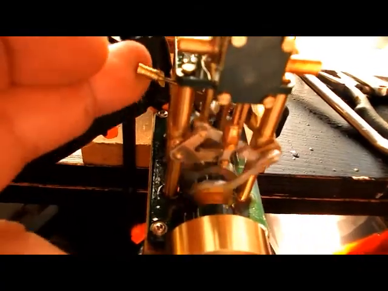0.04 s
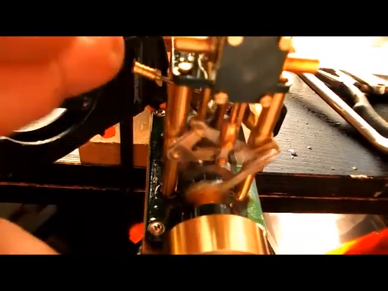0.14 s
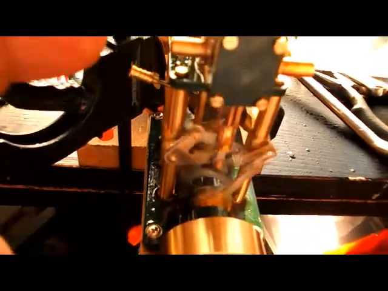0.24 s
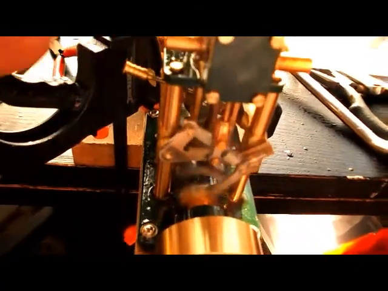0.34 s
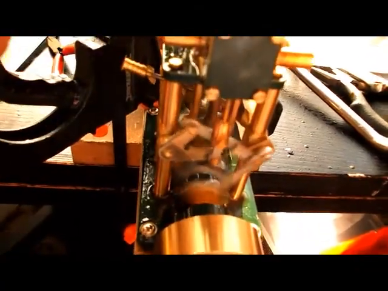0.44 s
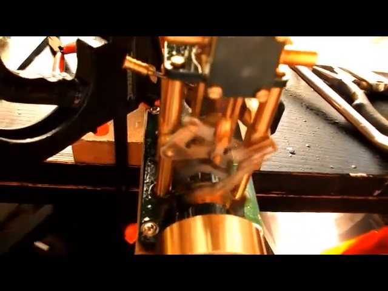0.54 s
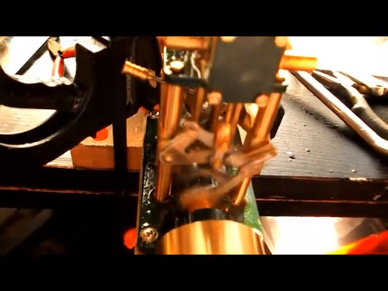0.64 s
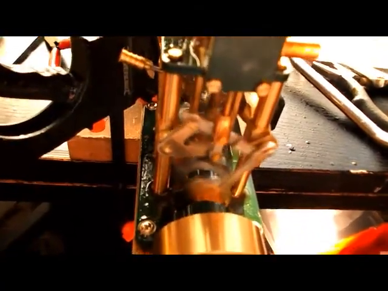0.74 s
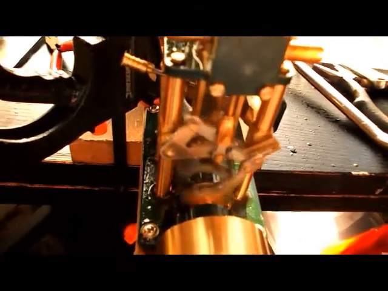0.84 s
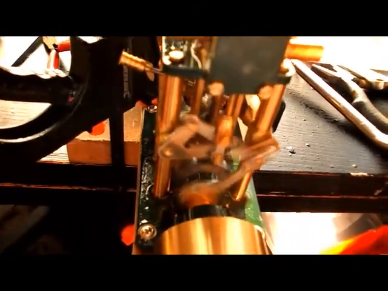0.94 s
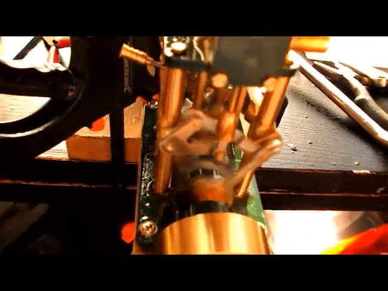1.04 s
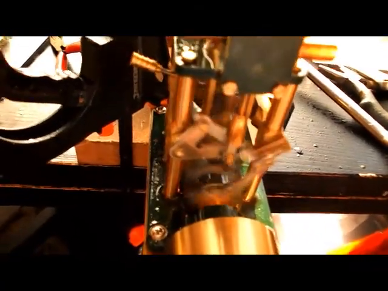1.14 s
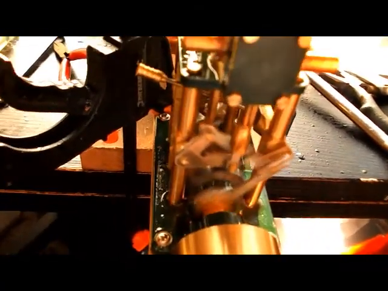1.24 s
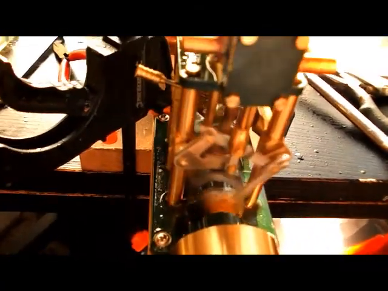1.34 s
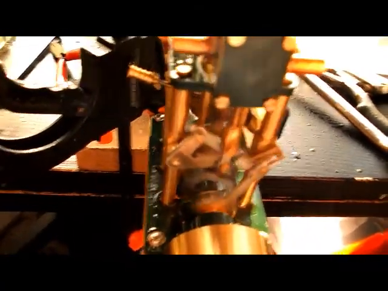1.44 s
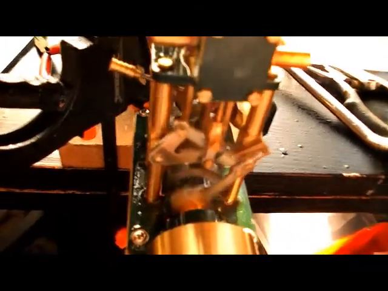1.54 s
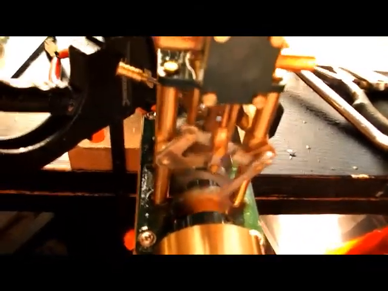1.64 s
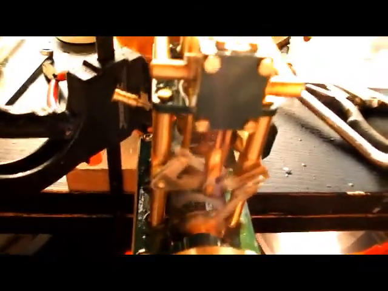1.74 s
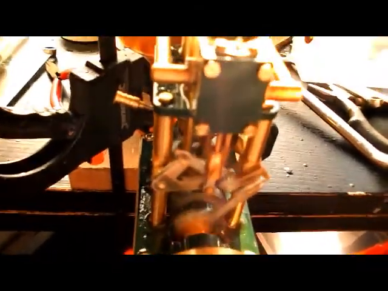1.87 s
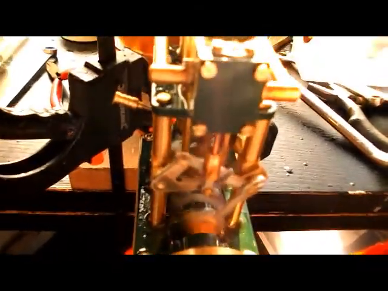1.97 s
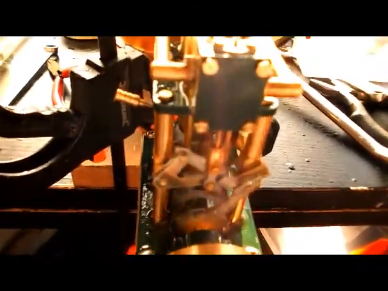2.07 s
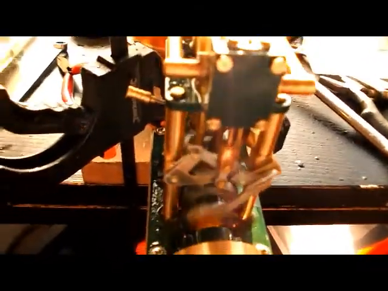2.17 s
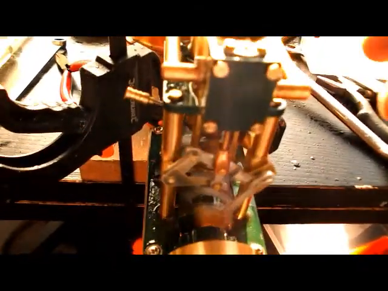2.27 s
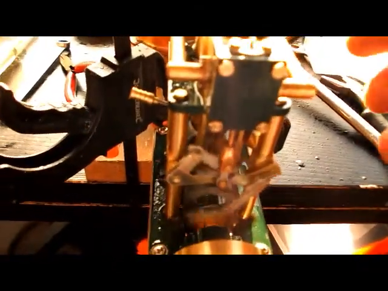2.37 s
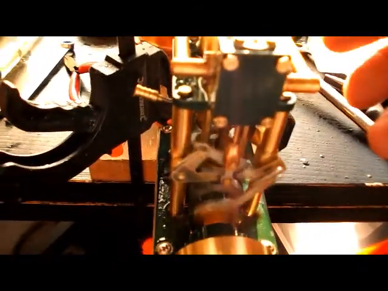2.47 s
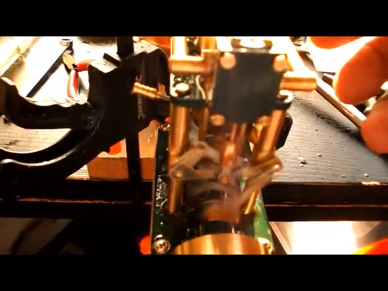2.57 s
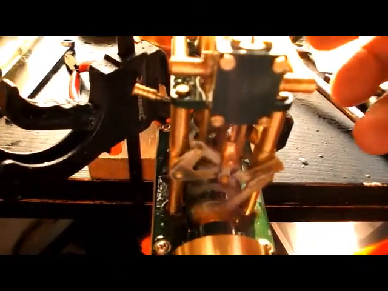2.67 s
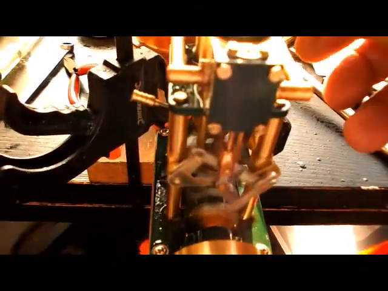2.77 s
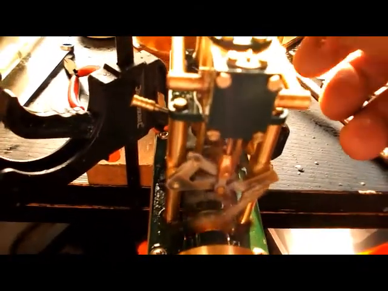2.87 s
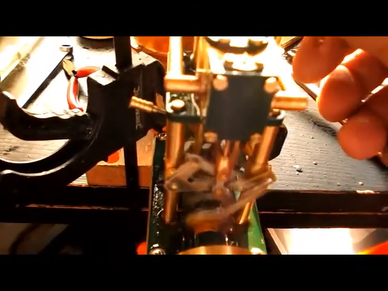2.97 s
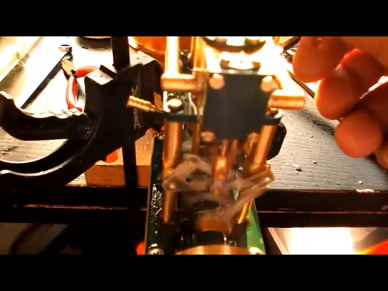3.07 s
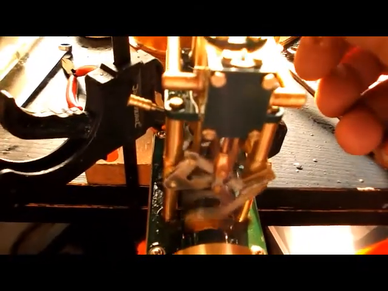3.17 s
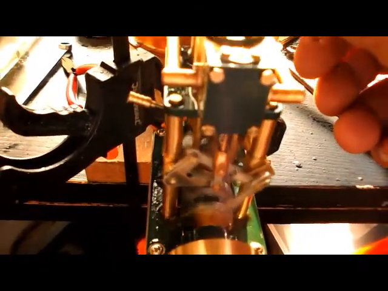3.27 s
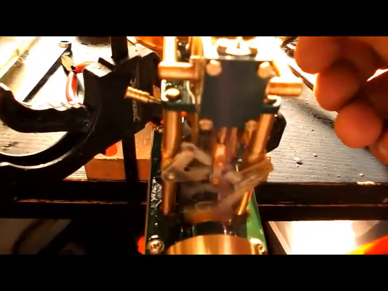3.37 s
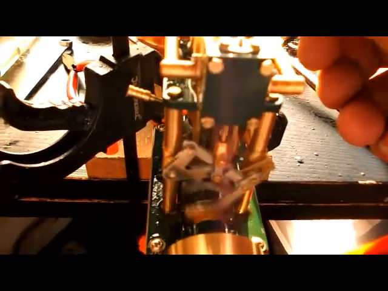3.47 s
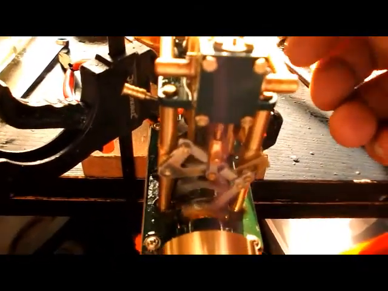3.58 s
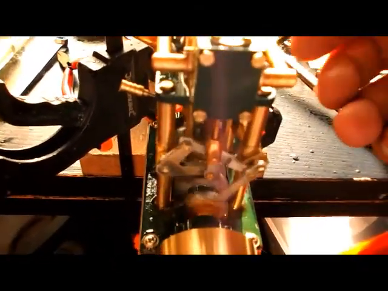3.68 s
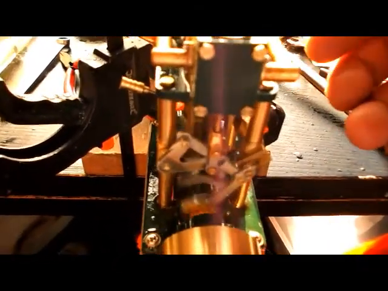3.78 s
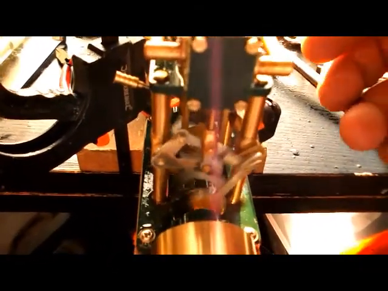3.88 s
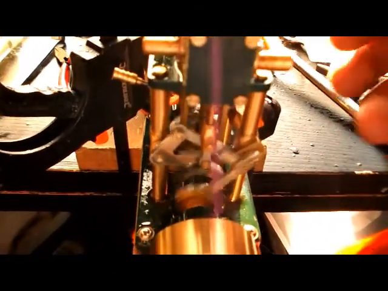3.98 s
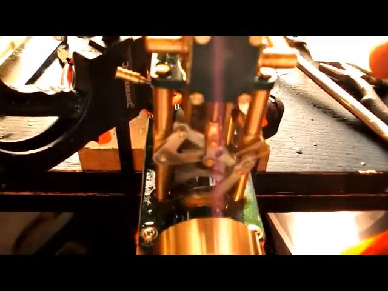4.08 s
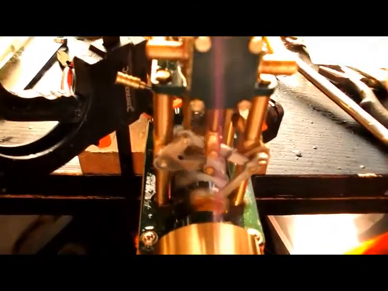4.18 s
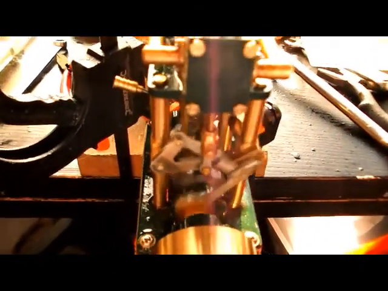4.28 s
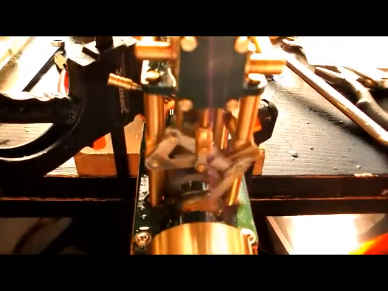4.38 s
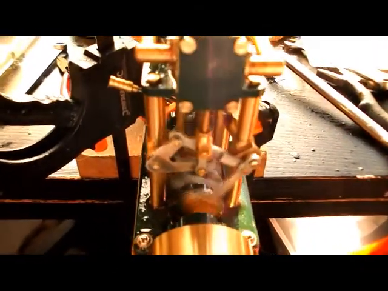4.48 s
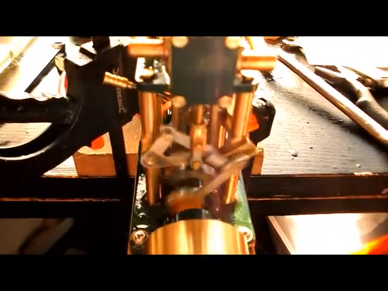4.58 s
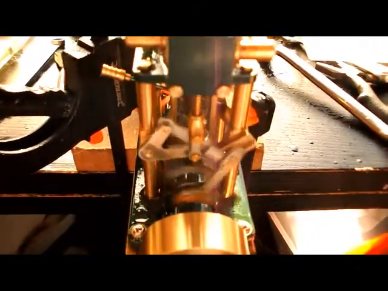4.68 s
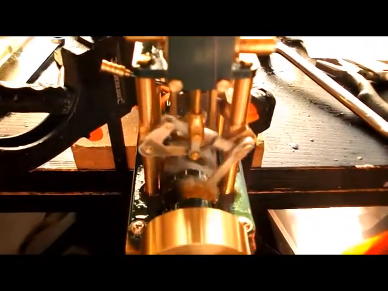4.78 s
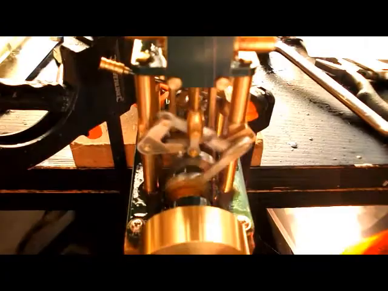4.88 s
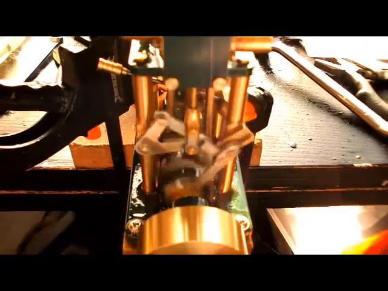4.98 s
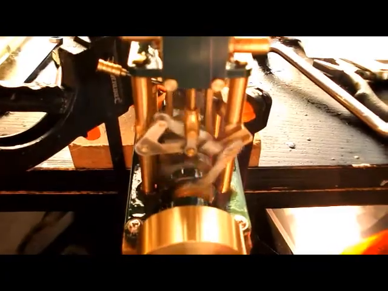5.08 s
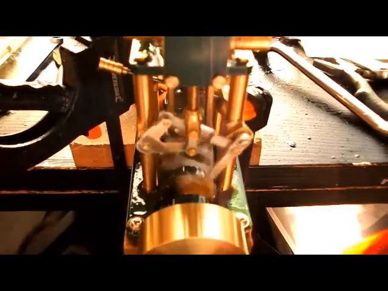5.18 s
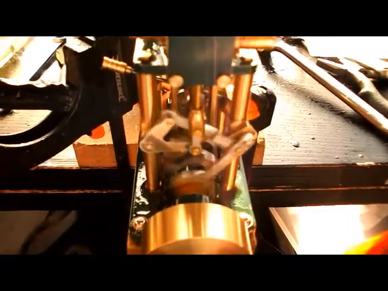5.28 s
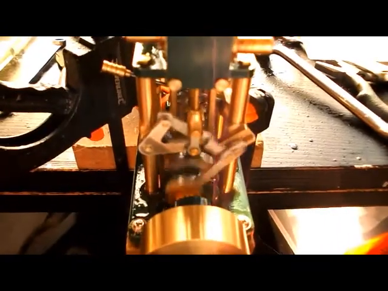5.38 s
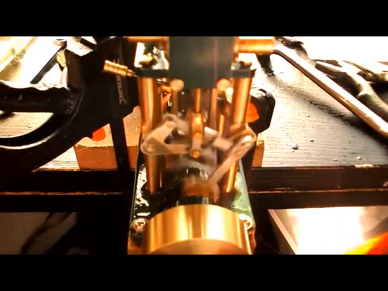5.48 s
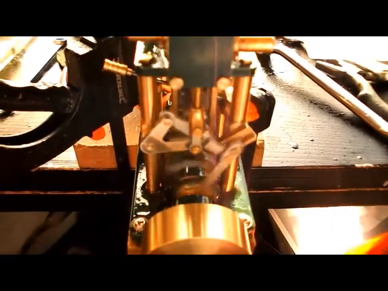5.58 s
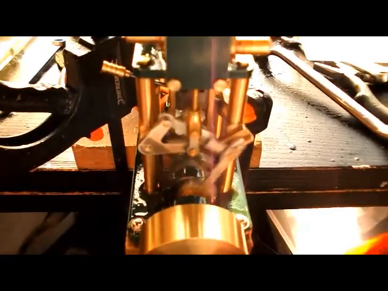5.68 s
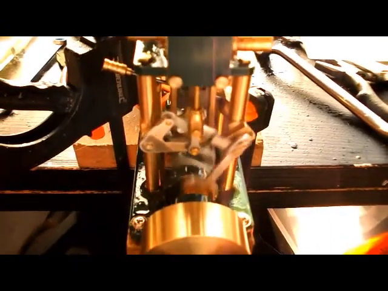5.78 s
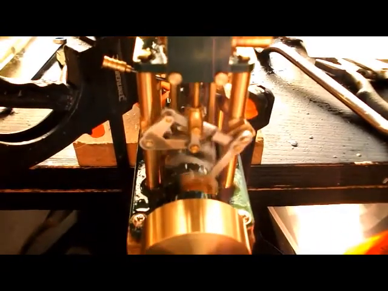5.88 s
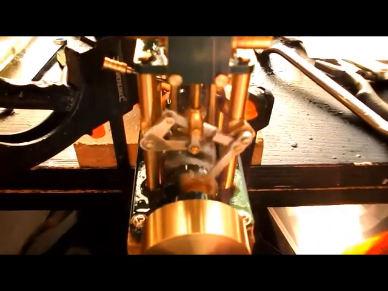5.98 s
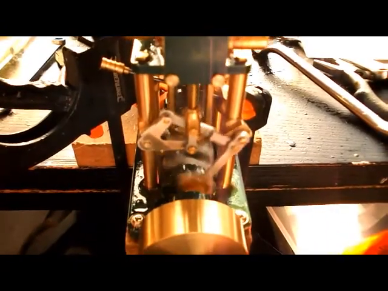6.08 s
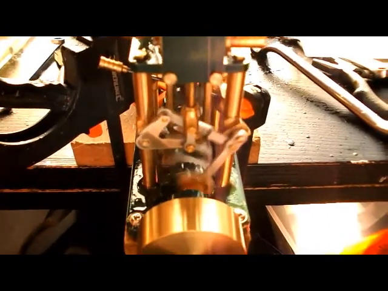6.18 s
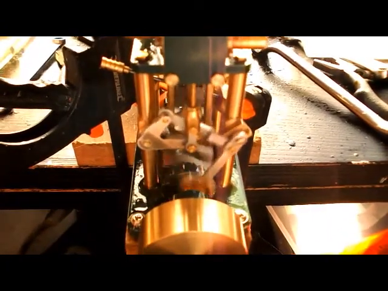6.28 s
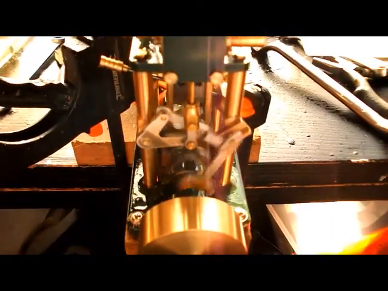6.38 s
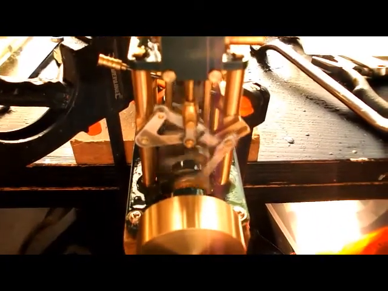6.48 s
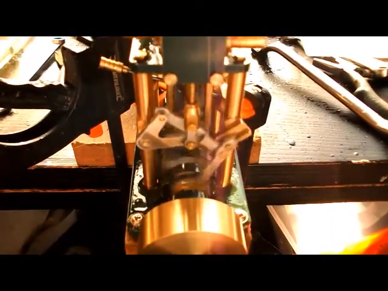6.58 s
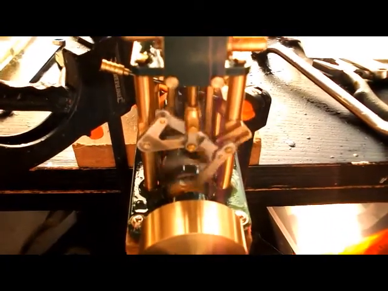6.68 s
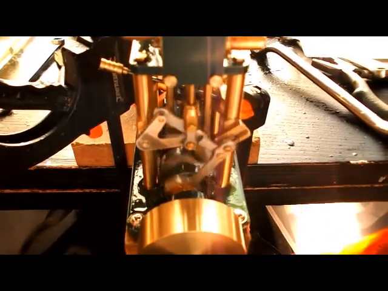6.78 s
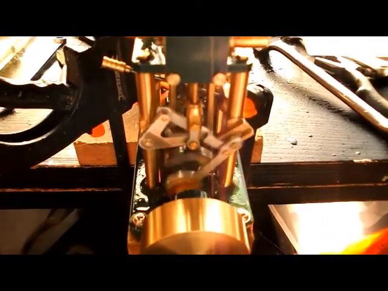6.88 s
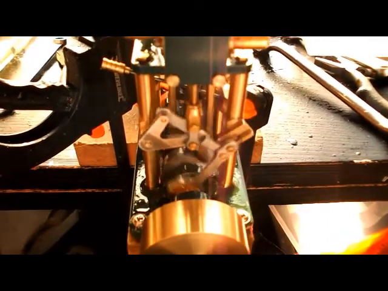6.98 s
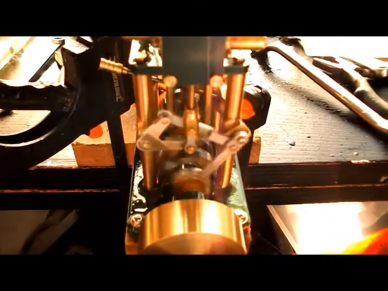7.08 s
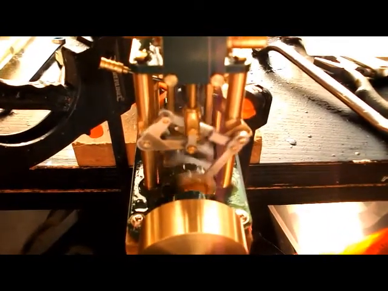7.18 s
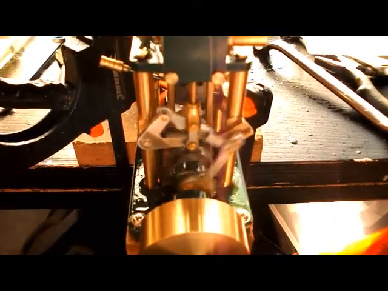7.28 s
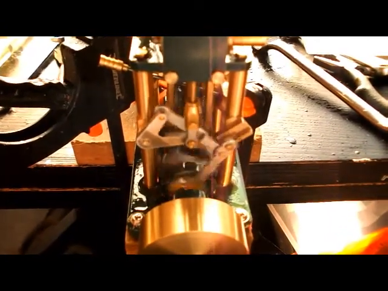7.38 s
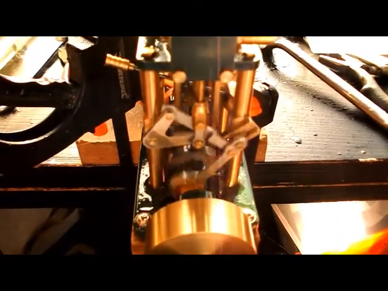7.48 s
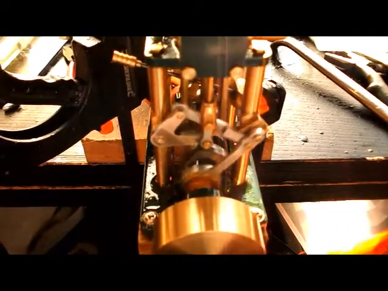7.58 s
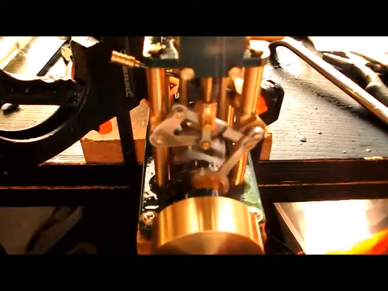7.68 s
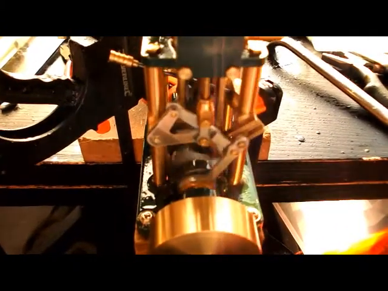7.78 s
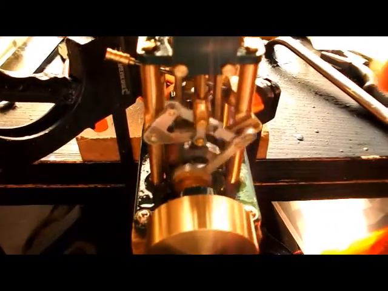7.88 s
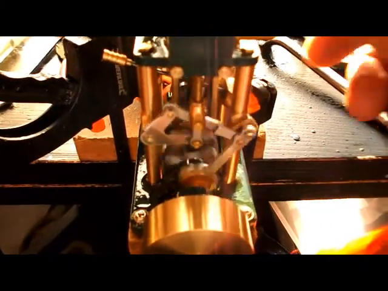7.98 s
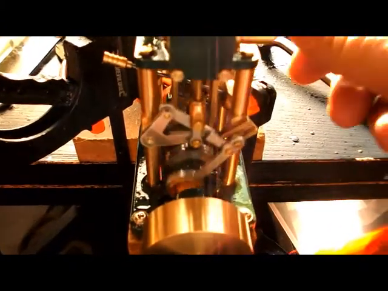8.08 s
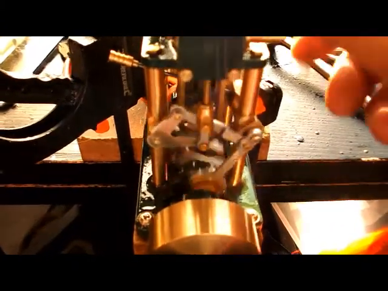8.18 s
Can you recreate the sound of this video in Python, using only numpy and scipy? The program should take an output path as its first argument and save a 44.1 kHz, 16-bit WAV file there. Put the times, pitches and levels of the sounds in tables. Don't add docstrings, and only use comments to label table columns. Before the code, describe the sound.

A small brass steam engine on an indoor workbench, heard very close and dry. It starts within a fraction of a second, racing into a dense metallic clatter with steam hiss and low bench hum. Sharp stray knocks overload the microphone and briefly dip the sound. Around 3.5 seconds it is throttled back, becoming quieter and slower until individual clicks and knocks stand out.

```python
import sys
import numpy as np
from scipy import signal
from scipy.fft import rfft, irfft, next_fast_len
from scipy.io import wavfile
from scipy.ndimage import uniform_filter1d, map_coordinates

SR = 44100
rng = np.random.default_rng(int(sys.argv[2]) if len(sys.argv) > 2 else 0)


def boost(x):
    u = np.asarray(x, float) / 20
    return 10 ** u


def pcm_store(signal):
    levels = np.round(np.clip(np.atleast_2d(signal), -1, 1) * 32767)
    wavfile.write(sys.argv[1], SR, levels.astype(np.int16).T)


N = 362937
T_S = np.arange(N) / SR

# (frequency [Hz], density [dB per Hz])
AIR_SPECTRUM = [(12, -56), (20, -19), (145, -13.5), (286, 0), (392, -8), (600, -11.5), (780, -12),
                (1320, -120)]
STEAM_SPECTRUM = [(880, -35), (1500, -6), (2390, -12.5), (3150, -10), (5330, -25), (6760, -4), (9650, -22),
                  (16000, -11)]

# (frequency [Hz], width [Hz], level [dB])
BENCH_MODES = [(138, 36, -22), (239.4, 5.2, 1), (287.3, 8.8, 2.5), (311, 36, -8), (425, 51, -17)]
FRAME_MODES = [(455, 35, -10), (560, 35, -6), (680, 80, -14), (770, 45, -8), (845, 50, -5), (908, 40, -1),
               (1085, 80, -2), (1210, 50, -3), (1330, 120, -12)]
BRACKET_MODES = [(1480, 120, -12), (1655, 60, 0), (1770, 70, -4), (1880, 90, -11), (2010, 90, -5)]
ROD_MODES = [(2250, 260, -16), (2645, 115, 0), (3090, 240, -11)]
LINK_MODES = [(3330, 300, -6), (3700, 320, -2), (4100, 300, -1), (4450, 300, -2), (5150, 320, 0),
              (5850, 600, -5), (6450, 500, -4), (7200, 500, -5)]
PIN_MODES = [(8230, 970, -3), (9380, 1350, -3), (12900, 5100, -9.5), (14300, 330, -15)]
# (frequency [Hz], width [Hz], level [dB])
HOUSING_NOTCHES = [(7700, 170, -11), (11100, 900, -3), (14450, 200, -8)]

# (time [s], rate [turns/s])
CRANK_SPEED = [(.1, 18.3), (.25, 25), (.35, 26.46), (1, 26.488), (1.55, 27.082), (2, 26.601),
               (3.47, 25.754), (3.55, 18.337), (3.68, 14.886), (3.85, 13.953), (4.5, 13.365), (5.5, 11.779),
               (6.35, 9.203), (6.72, 9.391), (6.95, 8.602), (7.45, 8.326), (8, 5.99), (8.45, 4.148)]
# (time [s], shake [dB], bench [dB])
EFFORT_CURVE = [(0, -41.5, -51), (.065, -34, -32), (.095, -26.5, -36), (.15, -24.5, -42), (.45, -26.5, -33),
                (1.3, -26.5, -28.5), (2.1, -27, -29), (3.46, -27, -28.5), (3.66, -30.5, -34),
                (4.3, -32, -29), (5.1, -33, -34.5), (6.1, -34.5, -40), (7.6, -36, -41.5),
                (8.23, -39, -42.5)]
# (crank angle [turns], racing [dB], throttled [dB])
BENCH_PUSHES = [
    (.06, 11, 4),
    (.42, -17, 7),
    (.68, -29, 7.5),
]
# (crank angle [turns], racing [dB], throttled [dB])
BRACKET_HITS = [
    (.006, -31, -35.5),
    (.11, -28, -29),
    (.25, -50, -45),
    (.39, -23, -34),
    (.428, -43, -27),
    (.68, -28.5, -35),
    (.8, -49, -40.5),
]

# (crank angle [turns], frame [dB], rod [dB], link [dB], pin [dB])
LOOSE_HITS = [(.007, -31, -22, -17, -23), (.045, -40, -9, -12, -26), (.056, -38, -26, -9, -18),
              (.105, -29, -25, -22, -26), (.175, -30, -31, -17, -19), (.242, -31, -25, -19, -8),
              (.302, -40, -15, -26, -34), (.314, -37, -28, -14, -22), (.388, -34, -33, -23, -22),
              (.545, -33, -28, -10, -14), (.598, -38, -37, -19, -15), (.714, -34, -37, -19, -28),
              (.729, -39, -51, -15, -20), (.91, -38, -38, -23, -18)]
SEATED_HITS = [(.005, -44, -22, -38, -38), (.044, -43, -9, -10, -19), (.063, -35, -23, -16, -17),
               (.112, -27, -27, -24, -33), (.183, -31, -33, -16, -15), (.244, -24, -27, -18, -7),
               (.304, -48, -11, -19, -25), (.324, -44, -25, -20, -23), (.39, -30, -31, -27, -22),
               (.557, -40, -38, -29, -23), (.608, -35, -41, -28, -18), (.694, -29, -34, -16, -25),
               (.734, -33, -41, -24, -18), (.92, -40, -47, -24, -19)]
THROTTLED_HITS = [(.045, -45, -24, -23, -26), (.093, -36, -18, -28, -28), (.124, -36, -32, -34, -36),
                  (.193, -36, -44, -30, -28), (.28, -34, -43, -29, -25), (.356, -37, -23, -26, -22),
                  (.424, -38, -26, -26, -25), (.438, -40, -36, -23, -20), (.634, -45, -29, -21, -22),
                  (.665, -42, -42, -26, -24), (.777, -39, -36, -24, -22), (.957, -53, -44, -27, -22),
                  (.98, -51, -45, -25, -22)]
CRAWLING_HITS = [(.075, -56, -25, -32, -39), (.112, -37, -21, -36, -45), (.115, -35, -31, -24, -32),
                 (.186, -44, -30, -24, -30), (.299, -46, -29, -34, -39), (.375, -35, -28, -35, -40),
                 (.423, -35, -26, -26, -27), (.458, -43, -48, -27, -17), (.658, -46, -26, -25, -29),
                 (.671, -43, -42, -31, -37), (.806, -38, -46, -33, -45), (1.004, -50, -33, -26, -22),
                 (1.009, -48, -40, -19, -16)]
# (time [s], peak [dB], rod [dB], pin [dB], overload [dB])
STRAY_HITS = [(0.0436, 1.5, -27, -5, 13), (0.084, -13, -15, -13, 3.5), (0.0927, -2, -25, -8, -1.5),
              (0.096, -5, -27, -6, 8), (0.1133, -4, -12, -17, -0.5), (0.1264, -4, -17, -13, 0.5),
              (0.3733, -7, -33, -2, 4), (0.5228, 4, -13, -16, 6), (0.5608, -5, -16, -6, 8.5),
              (0.82, -12, -36, 0, 5), (0.891, -6, -32, -9, 7.5), (1.13, -10, -30, 0, -0.5),
              (1.455, -11, -28, -17, -1.5), (1.7117, -8, -34, -4, 4.5), (1.9572, 3, -21, -19, 12)]

START_TURN, LAST_TURN, VALVE_S = -2.7254, 140, 3.52
SEATING_S, SEATED_S = (0.82, 1.8), 1.96
SLOW_TURN_S, TIRED_TURN_S = (.07, .116), .13


def unit(x):
    return x / np.sqrt(np.mean(x ** 2) + 1e-20)


def curves(rows):
    s, *columns = np.transpose(rows)
    return [np.interp(T_S, s, column) for column in columns]


def wobble(rate_hz):
    knots = rng.standard_normal(int(N * rate_hz / SR) + 4)
    return map_coordinates(knots, [T_S * rate_hz])


def filtered(x, response):
    m = next_fast_len(N + SR // 2)
    return irfft(rfft(x, m) * response(np.fft.rfftfreq(m, 1 / SR)), m)[:N]


def coloured(spectrum):
    f, db = np.transpose(spectrum)
    shape = lambda hz: boost(np.interp(np.log(hz + 1), np.log(f + 1), db))
    return unit(filtered(rng.standard_normal(N), shape))


def rung(x, modes, steep):
    low_hz, high_hz = modes[0][0] / steep, modes[-1][0] * steep

    def response(f):
        skirt = (1j * f / (low_hz + 1j * f)) ** 2 * (high_hz / (high_hz + 1j * f)) ** 2
        body = 0
        for k, (hz, width_hz, db) in enumerate(modes):
            damping = 1j * f * width_hz
            body = body + (-1) ** k * boost(db) * damping / (hz * hz - f * f + damping)
        return body * skirt

    ring = irfft(response(np.fft.rfftfreq(8192, 1 / SR)))
    return filtered(x, response) / np.sqrt(uniform_filter1d(ring ** 2, size=20).max())


def blows(s, db, chatter, chatter_s, way=1):
    t = np.arange(160) / SR
    decay = np.exp(-t / chatter_s) / np.sqrt(chatter_s * SR / 2)
    shape = chatter * rng.standard_normal((len(s), len(t))) * decay
    shape[:, 0] = way
    at = np.round(s * SR).astype(int)[:, None] + np.arange(len(t))
    return np.bincount(at.ravel(), (boost(db)[:, None] * shape).ravel(), N + SR)[:N]


def crank_turns():
    s, rate = np.transpose(CRANK_SPEED)
    return START_TURN + np.cumsum(np.interp(np.arange(N + SR // 2) / SR, s, rate)) / SR


def crank_angle():
    return crank_turns()[:N] % 1


def crank_time(turns):
    done = crank_turns()
    return np.interp(turns, done, np.arange(len(done)) / SR)


def every_turn(rows, scatter_db):
    angle, racing_db, throttled_db = np.transpose(rows)
    s = crank_time(np.arange(LAST_TURN)[:, None] + angle)
    db = np.where(s < VALVE_S, racing_db, throttled_db) + scatter_db * rng.standard_normal(s.shape)
    return s.ravel(), db.ravel()


def room_air(shake_db):
    return boost(1.048 * shake_db - 5.5) * coloured(AIR_SPECTRUM)


def steam(shake_db):
    leak_db = -19.5 + 0.87 * (shake_db - shake_db.max()) - 5.5
    puff_db = 5 * np.exp(-((crank_angle() - .63) / .05) ** 2)
    return boost(leak_db + puff_db + 1.9 * wobble(40)) * coloured(STEAM_SPECTRUM)


def bench(bench_db):
    s, db = every_turn(BENCH_PUSHES, scatter_db=1.04)
    push = np.bincount(np.round(s * SR).astype(int), boost(db), N + SR)[:N]
    push /= np.sqrt(np.abs(uniform_filter1d(push ** 2, SR // 2)) + 1e-9)
    hum = unit(rung(push + .18 * rng.standard_normal(N), BENCH_MODES, steep=2.2))
    calm = uniform_filter1d(1. * (T_S > 3.44) * (T_S < 5.36), size=SR // 5)
    lower = filtered(hum, lambda f: np.exp(-((f - 246) / 30) ** 2))
    return boost(bench_db) * (hum - 0.58 * calm * lower)


def bearing(shake_db):
    spots = np.column_stack([rng.uniform(0, 1, 40), 3 * rng.standard_normal((40, 2))])
    s, db = every_turn(spots, scatter_db=1)
    rub = unit(rung(blows(s, db, 0, .001), FRAME_MODES, steep=1.6))
    return (T_S < VALVE_S) * boost(shake_db - 7) * rub


def contacts(first, second, share, turns, play_turns):
    first, second = np.array(first), np.array(second)
    rows = first + share[:, None, None] * (second - first)
    angle = turns[:, None] + rows[..., 0] + play_turns * rng.standard_normal(rows.shape[:2])
    return crank_time(angle).ravel(), rows[..., 1:].reshape(-1, 4)


def joint_knocks():
    turns = np.arange(LAST_TURN)
    start = crank_time(turns)
    racing = start < VALVE_S
    seated = np.interp(start, SEATING_S, (0, 1))
    slowed = np.interp(crank_time(turns + 1) - start, SLOW_TURN_S, (0, 1))
    fast_s, fast_db = contacts(LOOSE_HITS, SEATED_HITS, seated[racing], turns[racing], play_turns=.002)
    slow_s, slow_db = contacts(THROTTLED_HITS, CRAWLING_HITS, slowed[~racing], turns[~racing], play_turns=.0033)
    stray_s, peak, rod, pin, _ = np.transpose(STRAY_HITS)
    stray_db = np.transpose([peak - 25, peak + rod + 6, peak - 9, peak + pin + 6])
    s = np.concatenate([fast_s, slow_s, stray_s])
    db = np.concatenate([fast_db + 1, slow_db + 3.5, stray_db])
    db = db + .6 * rng.standard_normal((len(s), 1)) + .7 * rng.standard_normal(db.shape)
    stroke = abs(np.interp(s, T_S, crank_angle()) - .3) < .08
    db[:, 0] += 13 * stroke * np.exp(-((s - 3.98) / .17) ** 2)
    db[:, 2] += 1.5 * (s < SEATED_S)
    turn_s = crank_time(np.interp(s, start, turns) + 1) - s
    db -= 6 * np.log10(np.maximum(1, turn_s / TIRED_TURN_S))[:, None]
    return s, db


def linkage(shake_db):
    s, db = joint_knocks()
    frame, rod, link, pin = [(s, part_db) for part_db in db.T]
    bracket = every_turn(BRACKET_HITS, scatter_db=1.1)
    rattle_s = rng.uniform(0, N / SR, 20000)
    rattle_size_db = 2.1 * rng.exponential(size=len(rattle_s))
    load = np.cos(2 * np.pi * (crank_angle() - .28))
    hush_db = -5 * (T_S < VALVE_S)
    jingle_db = 6 * (T_S < SEATED_S)
    # (modes, hits, strike direction, knock [dB], rattle [dB], swing [dB], chatter share, chatter decay [s])
    parts = [(FRAME_MODES, frame, 1, -1, -4 + hush_db, 3, .2, .001),
             (BRACKET_MODES, bracket, 1, -1.5, -8, 3, .25, .001),
             (ROD_MODES, rod, -1, -3, -7, 4, .25, .001),
             (LINK_MODES, link, 1, -1.5, -2.5 + jingle_db, 2.5, .7, .0011),
             (PIN_MODES, pin, 1, -1.5, -3 + jingle_db, 1.5, .6, .0007)]
    out = 0
    for modes, (hit_s, hit_db), way, knock_db, rattle_db, swing_db, chatter, chatter_s in parts:
        strikes = blows(hit_s, hit_db + knock_db, chatter, chatter_s, way)
        ways = rng.choice([-1, 1], len(rattle_s))
        shaking = blows(rattle_s, rattle_size_db, chatter, chatter_s, ways)
        rattle = unit(rung(shaking, modes, steep=1.4))
        rattle_level = boost(shake_db + rattle_db + swing_db * load)
        out = out + rung(strikes, modes, steep=1.4) + rattle_level * rattle
    return out


def scene():
    shake_db, bench_db = curves(EFFORT_CURVE)
    background = room_air(shake_db) + steam(shake_db) + bench(bench_db)
    return (background + bearing(shake_db) + linkage(shake_db))[None]


def low_pass(x):
    return signal.sosfilt(signal.butter(12, 16450, fs=SR, output="sos"), x)


def record(dry):
    def housing(f):
        dips_db = sum(db * np.exp(-((f - hz) / width_hz) ** 2) for hz, width_hz, db in HOUSING_NOTCHES)
        return boost(dips_db) / (1 + (f / 15800) ** 200)

    x = filtered(dry[0], housing)
    duck_db = 0
    for s, *_, overload_db in STRAY_HITS:
        duck_db = duck_db + abs(overload_db) * (T_S > s + .0015) * np.exp(-np.abs(T_S - s) / 0.021)
    x = x * boost(-uniform_filter1d(duck_db, 40))
    x = x / (1 + np.abs(x / 1.02) ** 8) ** (1 / 8)
    return low_pass(x[None])


dry = scene()
out = record(dry)
pcm_store(out)
```